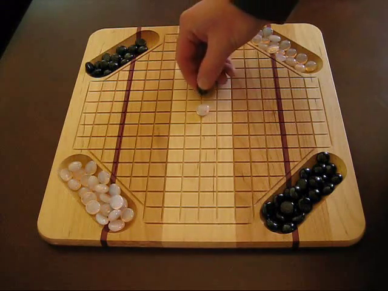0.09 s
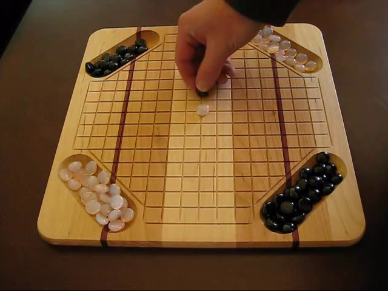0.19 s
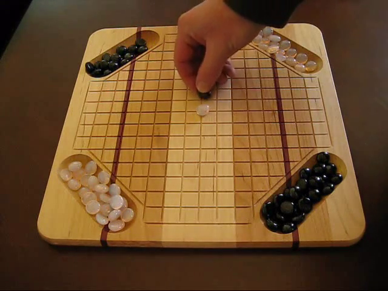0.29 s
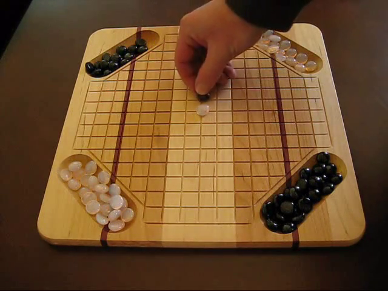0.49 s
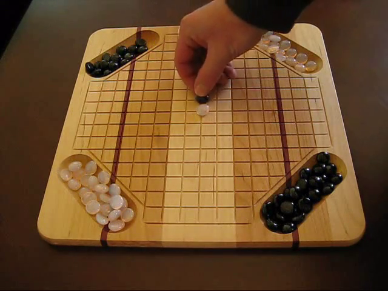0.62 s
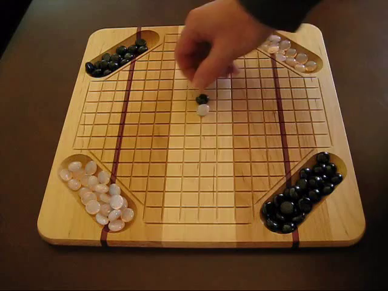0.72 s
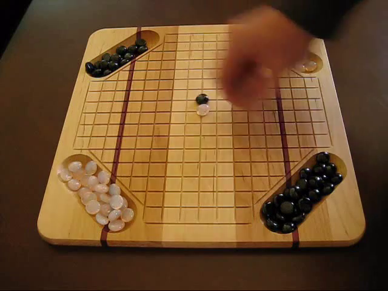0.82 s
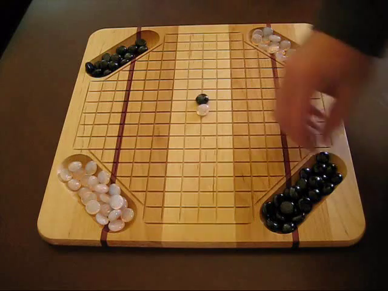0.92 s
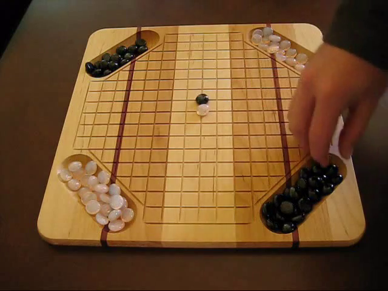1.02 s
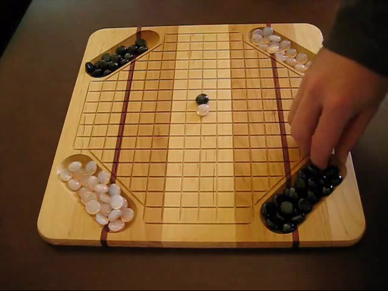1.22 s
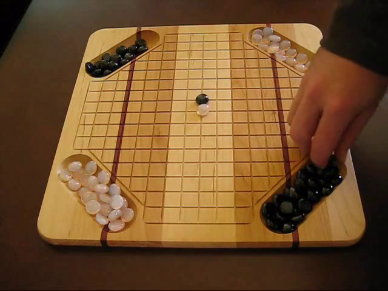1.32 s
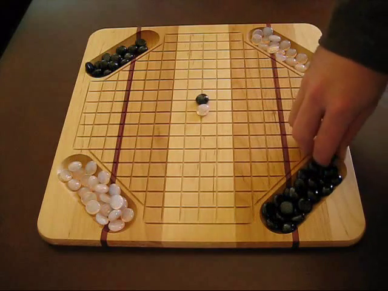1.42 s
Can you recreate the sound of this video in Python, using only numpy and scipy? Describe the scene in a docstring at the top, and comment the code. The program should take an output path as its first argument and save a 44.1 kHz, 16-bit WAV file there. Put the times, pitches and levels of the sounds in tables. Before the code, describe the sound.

A glass gem is set on a wooden game board: a duller edge tap at 0.24 s, then a bright, hard snap at 0.39 s with an immediate tiny bounce. Very faint nudges come near 0.75-0.79 s. At 1.11-1.19 s gems clink and knock sharply in a wooden hollow, then shuffle more softly at 1.33-1.43 s. Short small-room reflections, close mono pickup, steady low hiss and barely audible hum.

```python
"""A small room, where a glass gem is set down on a wooden game board: one edge taps, it snaps flat and bounces once.
The fingers nudge it as they let go, then reach into a hollow in the board, where gems clink and knock on the wood.
Wood sounds as a sum of decaying modes, contact and glass as decaying coloured noise; the room adds reflections.
A steady hiss with a faint, wavering low hum lies underneath."""
import sys
import numpy as np
from scipy import signal
from scipy.fft import rfft, irfft, next_fast_len
from scipy.io import wavfile

SR = 44100
rng = np.random.default_rng(int(sys.argv[2]) if len(sys.argv) > 2 else 0)


def int16_out(signal):
    """Quantize to a 16-bit WAV file."""
    q = np.round(np.clip(np.atleast_2d(signal).T, -1, 1) * 32767)
    wavfile.write(sys.argv[1], SR, q.astype(np.int16))


N = 63945  # length of the scene in samples


def amp(db):
    """Decibel law: a level in dB as an amplitude factor."""
    return 10 ** (np.asarray(db) / 20)


def unit(x):
    """Normalisation to an rms of 1."""
    return x / np.sqrt(np.mean(x ** 2) + 1e-20)


def along(points, hz):
    """Logarithmic frequency scale: (f/Hz, value) points joined by straight lines on it."""
    f, value = np.transpose(points)
    return np.interp(np.log(hz + 1), np.log(f + 1), value)


def filtered(x, response):
    """Linear filtering: the spectrum of x times a response of frequency."""
    size = next_fast_len(len(x) + 8192)
    hz = np.fft.rfftfreq(size, 1 / SR)
    return irfft(rfft(x, size) * response(hz), size)[:len(x)]


def cut(x, edge_hz, kind, order):
    """Causal Butterworth filtering, low-pass or high-pass."""
    edge_hz = min(edge_hz, SR / 2 - 1)
    sos = signal.butter(order, edge_hz, kind, fs=SR, output="sos")
    return signal.sosfilt(sos, x)


def noise(spectrum, size):
    """Spectral shaping: white noise coloured by (f/Hz, level/dB) points, with an rms of 1."""
    white = rng.standard_normal(size)
    return unit(filtered(white, lambda hz: amp(along(spectrum, hz))))


def add(track, s, sound):
    """Superposition: a sound is added to the track from time s."""
    part = track[round(s * SR):][:len(sound)]
    part += sound[:len(part)]


def ring(modes, t, attack_s, hold_s, scatter_db):
    """Modal superposition: struck modes rise, hold, then fade, with random weights at every blow."""
    fading = np.maximum(t - hold_s, 0)
    total = np.zeros(len(t))
    for hz, db, t60 in modes:
        level_db = db + scatter_db * rng.standard_normal()
        total += amp(level_db - 60 * fading / t60) * np.sin(2 * np.pi * hz * t)
    return total * (1 - np.exp(-t / attack_s))


# decay time of the room's tail [f/Hz, t60/s]
ROOM_DECAY = [(200, 0.42), (1000, 0.31), (3000, 0.24), (6000, 0.2), (10000, 0.16), (16000, 0.24)]
# colour of all the reflections [f/Hz, level/dB]
REFLECTION_COLOUR = [(200, 1.5), (550, 1), (1000, 5), (1750, 2), (2600, 2), (3500, -7), (5500, 1.5),
                     (10000, -6), (16000, -10)]


def in_room(sound, room_db):
    """Reverberation: convolution with a direct pulse, near reflections and a decaying diffuse tail."""
    delay_s = 0.0025  # the first reflections come from the table top and the hand
    near_t60_s, near_db = 0.025, -7.5
    hz, t, bands = signal.stft(rng.standard_normal(SR // 2), SR, nperseg=256)
    room_fade = amp(-60 * t / along(ROOM_DECAY, hz)[:, None])
    near_fade = amp(near_db - 60 * t / near_t60_s)
    tail = signal.istft(bands * (room_fade + near_fade), SR, nperseg=256)[1]
    tail /= np.linalg.norm(tail)
    tail = filtered(tail, lambda hz: amp(along(REFLECTION_COLOUR, hz)))
    gap = np.zeros(round(delay_s * SR))
    response = np.concatenate([[1], gap, amp(room_db) * tail])
    return signal.fftconvolve(sound, response)


# spectrum of the room hiss, relative density [f/Hz, level/dB]
HISS_SPECTRUM = [(15, -27), (25, -9.5), (75, -10.5), (103, -4.5), (404, -7.5), (475, -6.5), (790, -9),
                 (1500, -11), (2130, -12.5), (6540, -20.5), (7890, -26.5), (10300, -21.5), (15000, -26.5)]


def room_tone():
    """Stationary noise: a steady hiss, and a narrow band of noise that wavers as a faint low hum."""
    hiss_db, hum_db = -52, -70.5  # rms levels
    hum_hz, hum_width_hz = 100.4, 11
    white = rng.standard_normal(N)
    hum = filtered(white, lambda hz: 1 / (1 + ((hz - hum_hz) / hum_width_hz) ** 2))
    return amp(hiss_db) * noise(HISS_SPECTRUM, N) + amp(hum_db) * unit(hum)


# gems jostled in the hollow [t/s, knock on the wood level/dB, glass click level/dB]
HOLLOW_CONTACTS = [(1.112, -38, -44), (1.1175, -48, -27), (1.1236, -35, -23), (1.1251, -17.5, -16),
                   (1.1282, -24.5, -20), (1.1312, -36, -26), (1.1341, -44, -26.5), (1.1408, -46, -31),
                   (1.1441, -17, -35), (1.1540, -45, -33), (1.1568, -41, -34), (1.1619, -29.5, -19.5),
                   (1.1654, -29.5, -29.5), (1.1701, -31, -30), (1.1896, -40, -45), (1.325, -63, -43),
                   (1.335, -55, -41), (1.3520, -45, -42), (1.3619, -42, -35.5), (1.3792, -59, -35.5),
                   (1.3897, -36.5, -45), (1.4077, -34, -58), (1.4134, -33, -49), (1.4221, -38, -44),
                   (1.4253, -36, -51), (1.4295, -36, -54), (1.4336, -32, -49)]
# modes of the hollow [f/Hz, level/dB, t60/s]
HOLLOW_MODES = [(1023, -24, 0.018), (1450, -16.5, 0.0087), (1780, -12.5, 0.013), (1984, -6.5, 0.013),
                (2206, -3.5, 0.012), (2390, -19, 0.0095), (2710, -9, 0.013), (3180, -2, .012),
                (3340, -9, 0.0058), (4140, -12, 0.0089)]
# spectrum of glass on glass [f/Hz, level/dB]
CLICK_SPECTRUM = [(50, -36), (200, -21), (1000, -10.5), (3000, 3), (6500, -7), (8500, -2), (9700, 3),
                  (11500, -4), (13500, -3), (16000, -4.5)]
# modes of the board on the table [f/Hz, level/dB, t60/s]
THUD_MODES = [(157, -33.5, .09), (196, -27.5, 0.1)]


def gems_in_hollow():
    """Impact excitation: glass clicks as brief noise, knocks ring the hollow's modes and thud the board."""
    click_t60_s, room_db = 0.0086, -3.5
    radiate_hz = 667  # below this the wall of the hollow hardly moves the air
    track, t = np.zeros(N), np.arange(SR // 2) / SR
    for s, knock_db, click_db in HOLLOW_CONTACTS:
        wood = ring(HOLLOW_MODES, t, attack_s=0.00039, hold_s=0.00044, scatter_db=1.0)
        wood = cut(wood, radiate_hz, "high", order=2)
        click = amp(click_db - 60 * t / click_t60_s) * noise(CLICK_SPECTRUM, len(t))
        thud = ring(THUD_MODES, t, attack_s=0.0044, hold_s=0.0054, scatter_db=3.5)
        add(track, s, in_room(amp(knock_db) * wood + click, room_db))
        add(track, s, amp(knock_db) * thud)
    return track


# gem on the board [t/s, level/dB, low edge f/Hz, high edge f/Hz set by the hardness of the contact,
# pitch factor on the board's modes, thump of the whole board level/dB]
BOARD_CONTACTS = [(0.2378, -11.5, 650, 3670, .965, -48.5), (.3918, -21.5, 900, 4500, 1, -62),
                  (0.3935, -8, 1140, 6550, 1.005, -35.5), (.4006, -15, 930, 5160, .98, -49),
                  (.7475, -40, 550, 3020, .94, -62), (0.787, -38, 506, 1180, 1, -73)]
# modes of the board under a gem, before the pitch factor [f/Hz, level/dB, t60/s]
BOARD_MODES = [(860, -28.5, 0.044), (1180, -21, 0.024), (1384, -23, 0.013), (1756, -11.5, 0.017),
               (1794, -22, 0.088), (2260, -17, 0.023), (2586, -14, .016), (2847, -18.5, 0.069),
               (3330, -6, 0.0064), (3533, -3, 0.0064), (3650, -20, 0.015), (4490, -18, 0.0052),
               (4915, -7.5, 0.0044), (5036, -12, 0.0079), (5500, -27, 0.0048)]
# spectrum of the contact noise [f/Hz, level/dB]
CRACK_SPECTRUM = [(300, -24), (1200, 1), (4000, -2.5), (6200, 6.5), (7200, -19), (10000, 7), (12500, 5.5),
                  (15000, -6.5)]
# spectrum of the noisy after-ring: dense upper modes of the wood [f/Hz, level/dB]
GRAIN_SPECTRUM = [(300, -10.5), (900, -5), (1250, 3), (1500, -27), (2000, 2), (2700, 3.5), (4000, 7),
                  (4500, -7), (5600, 4.5), (6900, -7), (9000, -13), (15000, -22)]
# low bending modes of the whole board [f/Hz, level/dB, t60/s]
THUMP_MODES = [(394, -7, 0.069), (548, -1.5, 0.1), (598.6, -8.5, 0.24)]


def gem_on_board():
    """Contact stiffness: each contact rings and bends the board; a harder one has a higher upper edge."""
    crack_db, crack_t60_s = -1, 0.021
    grain_db, grain_t60_s = -23, 0.28
    room_db = -8.5
    track, t = np.zeros(N), np.arange(SR // 2) / SR
    for s, db, low_hz, hard_hz, pitch, thump_db in BOARD_CONTACTS:
        # scaled time shifts the modes and their decay rates alike
        wood = ring(BOARD_MODES, pitch * t, attack_s=0.00019, hold_s=0.0021, scatter_db=1.0)
        crack = amp(crack_db - 60 * t / crack_t60_s) * noise(CRACK_SPECTRUM, len(t))
        grain = amp(grain_db - 60 * t / grain_t60_s) * noise(GRAIN_SPECTRUM, len(t))
        thump = ring(THUMP_MODES, t, attack_s=0.0056, hold_s=0.0084, scatter_db=0.5)
        direct = cut(wood + crack, low_hz, "high", order=2)
        knock = in_room(direct, room_db)[:len(t)] + grain
        add(track, s, amp(db) * cut(knock, hard_hz, "low", order=4))
        add(track, s, amp(thump_db) * thump)
    return track


def scene():
    """Superposition of the room, the hollow and the board, in mono."""
    return (room_tone() + gems_in_hollow() + gem_on_board())[None]


def record(dry):
    """Band limitation: the sound has a narrow gap near 7.9 kHz and nothing above its top frequency."""
    gap_hz, gap_width_hz, top_hz = 7900, 380, 15600

    def response(hz):
        """Gaussian gap under a sharp upper limit."""
        gap = 1 - np.exp(-((hz - gap_hz) / gap_width_hz) ** 2)
        return gap * (hz < top_hz)

    return filtered(dry[0], response)[None]


dry = scene()
out = record(dry)
int16_out(out)
```